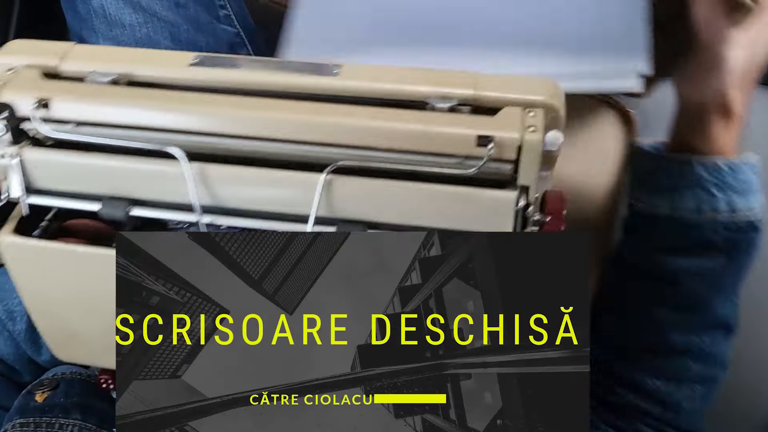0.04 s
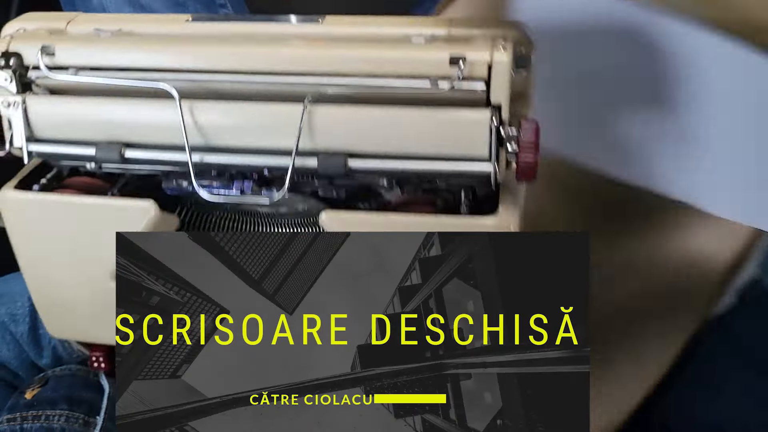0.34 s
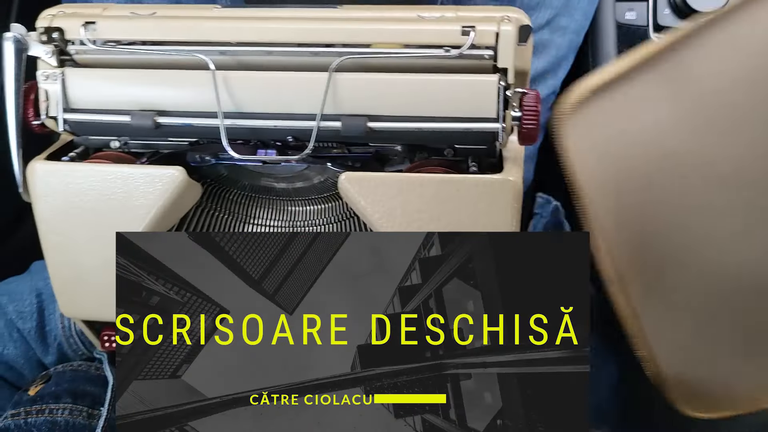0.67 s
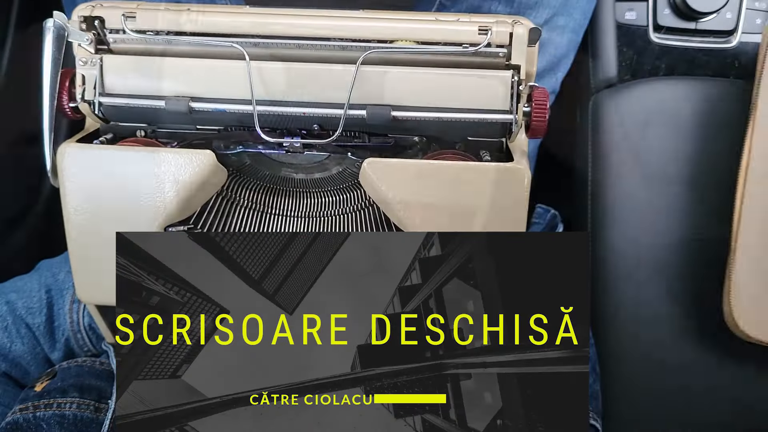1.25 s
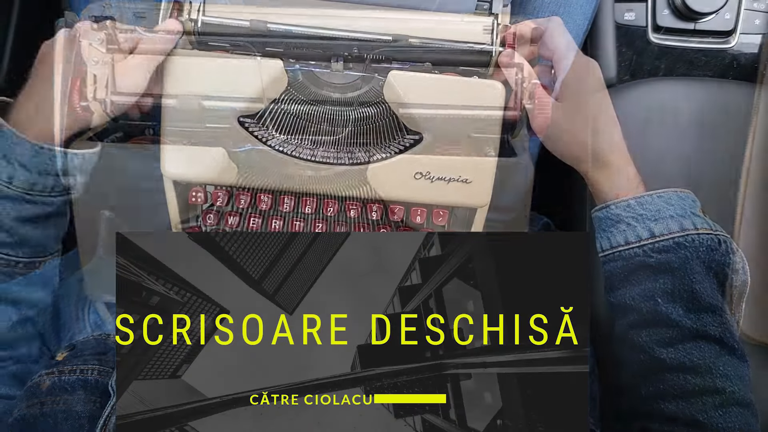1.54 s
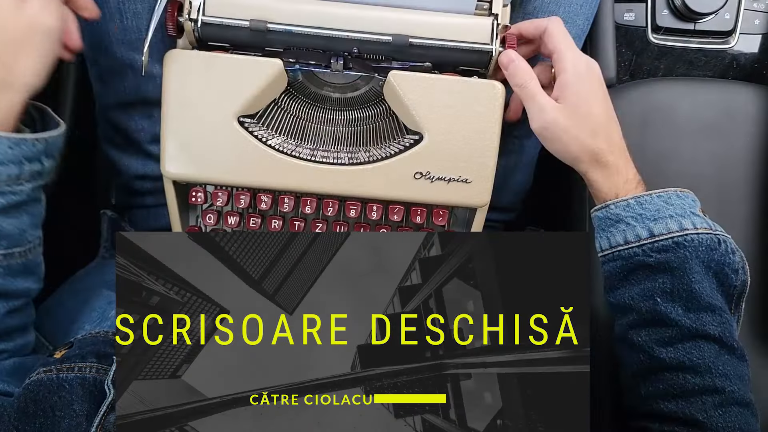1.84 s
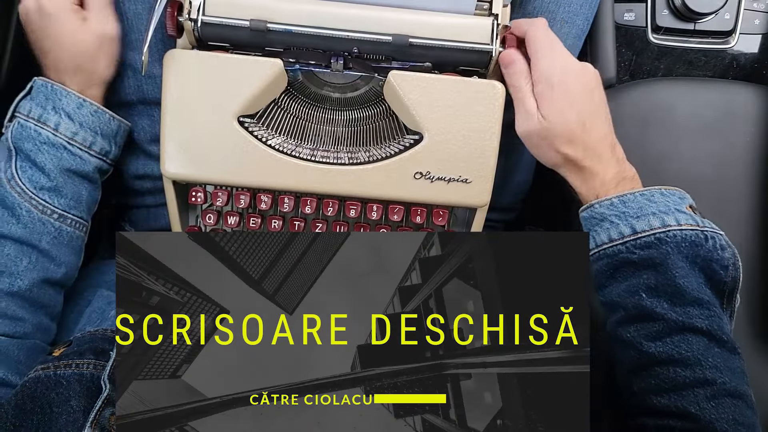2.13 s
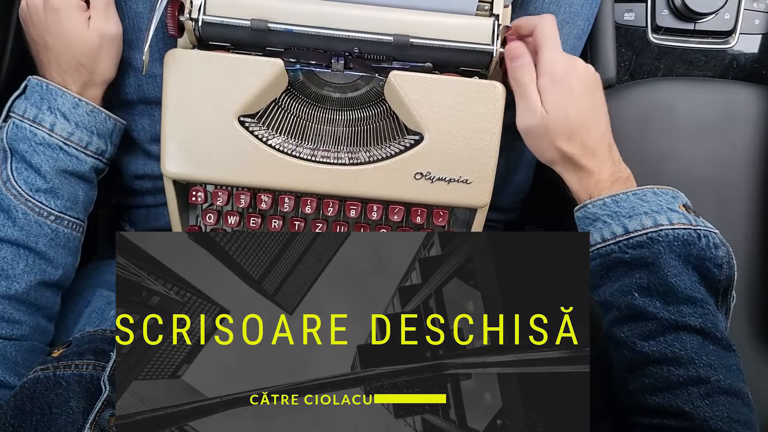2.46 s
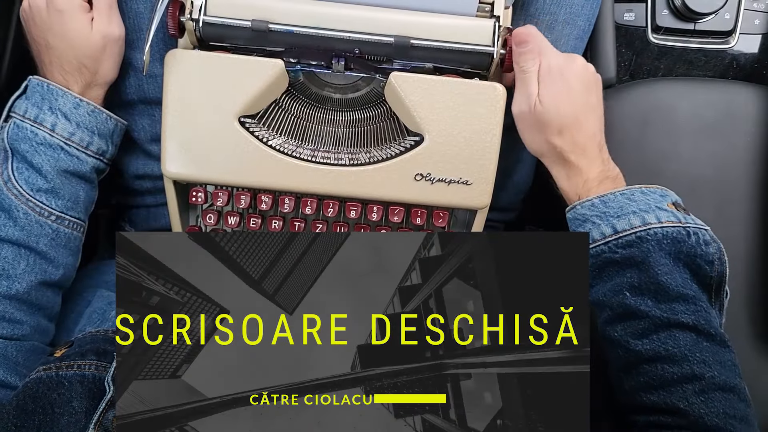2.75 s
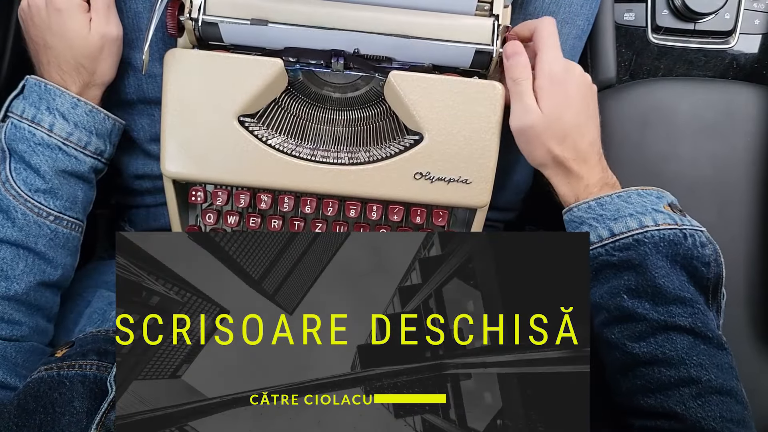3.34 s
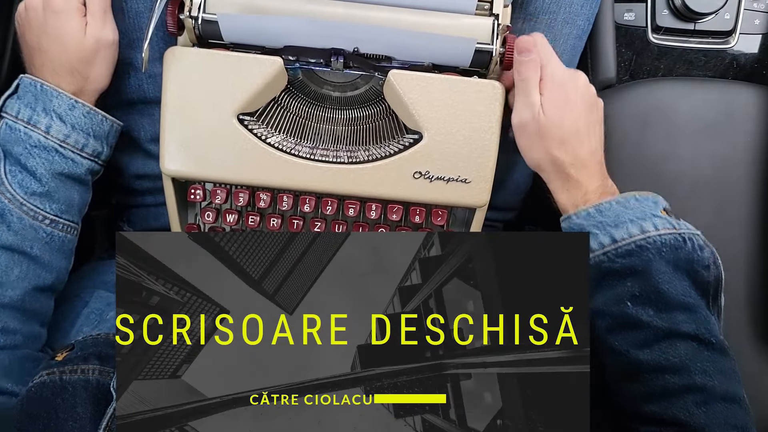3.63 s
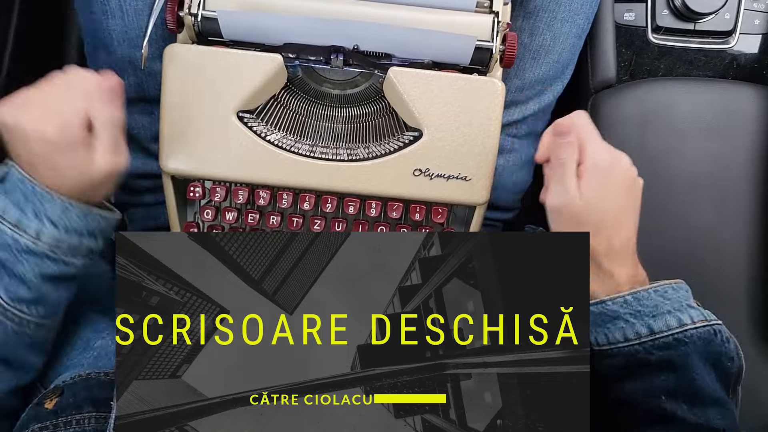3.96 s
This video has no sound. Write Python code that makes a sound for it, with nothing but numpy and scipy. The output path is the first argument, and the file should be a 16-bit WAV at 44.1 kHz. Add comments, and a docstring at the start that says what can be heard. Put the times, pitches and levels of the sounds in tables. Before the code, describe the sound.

A typewriter's roller ratchets close by in an idling car. First the cover knocks off and paper and sleeves rustle; at 0.9 seconds it lands and slides with two faint pings. Near 1.5 seconds a dry tick sounds, the hum drops, and hands knock the machine. Runs of metallic ratchet clicks come at about 2.2, 2.6, 3.0 and 3.5 seconds, followed by a soft knock and rustle.

```python
"""In an idling car, a portable typewriter's cover knocks as it is lifted off; paper and denim sleeves rustle.
Near 0.9 s the cover lands to the right, beside the seat, slides, and its metal catch pings twice.
At 1.5 s the low hum drops with one dry tick, then hands knock on the machine as they take the carriage.
From 2.2 s the platen knob turns in short strokes: the pawl snaps over the ratchet teeth and rings
the frame. The small padded cabin answers briefly."""
import sys
import numpy as np
from scipy import signal
from scipy.fft import rfft, irfft, next_fast_len
from scipy.io import wavfile
from scipy.ndimage import uniform_filter1d, map_coordinates

SR = 44100
rng = np.random.default_rng(int(sys.argv[2]) if len(sys.argv) > 2 else 0)


def to_wav(s):
    """Save 16-bit WAV."""
    ch = np.atleast_2d(s).T  # columns
    pcm = np.round(np.clip(ch, -1, 1) * 32767)  # PCM
    wavfile.write(sys.argv[1], SR, pcm.astype(np.int16))


N = 176400
T = np.arange(N) / SR
AGE = T[:SR // 3]  # seconds since a hit

# how alike close sounds are at the two ears: freq_hz, correlation
NEAR_CORRELATION = [(200, 1), (700, 0.42), (1500, 0.18), (2800, -0.037), (12000, -0.076)]


def ratchet():
    """The pawl cracks down on each tooth and rings with the frame; loose parts rattle, the case booms."""
    # pawl snaps: start_s, body_db, low_ring_db, high_ring_db, crack_db
    snaps = [(2.1787, -20, -39, -43, -31), (2.1858, -28, -30, -38, -34), (2.1944, -19.5, -45, -28, -46),
             (2.2063, -24, -58, -56, -95), (2.2685, -23.5, -35.5, -48, -37.5), (2.2829, -21, -30, -36, -42),
             (2.304, -22.5, -34, -31, -60), (2.3204, -23, -34, -35, -44.5), (2.3405, -23.5, -39, -38, -40),
             (2.362, -25.5, -24.5, -29.5, -21.5), (2.4503, -27.5, -34, -38.5, -53.5),
             (2.6395, -24.5, -26, -41, -34), (2.6463, -20.5, -33.5, -25.5, -23),
             (2.6543, -23, -27, -36.5, -58), (2.6616, -21, -23.5, -32, -45.5),
             (2.6748, -24, -38, -35.5, -44), (2.6926, -23.5, -38, -33, -45),
             (2.7077, -22, -22, -32.5, -45.5), (2.7225, -21, -27, -31.5, -46),
             (2.7337, -24, -34.5, -29.5, -47), (2.746, -20.5, -27.5, -36, -62),
             (2.764, -25.5, -38, -30.5, -48.5), (2.8229, -31, -33, -42, -50), (3.022, -25, -39, -45, -35),
             (3.0303, -23.5, -26.5, -28.5, -32), (3.0346, -20, -27.5, -29, -28.5),
             (3.0382, -27, -32.5, -30, -55.5), (3.0432, -22, -24.5, -34.5, -35),
             (3.0543, -23, -28, -27, -42), (3.07, -24.5, -27, -30, -26), (3.0859, -22, -30.5, -30, -38),
             (3.0959, -24.5, -24, -35.5, -39), (3.1066, -21, -48, -27.5, -43),
             (3.1174, -23.5, -29, -43, -26), (3.1283, -23.5, -30.5, -31, -29),
             (3.14, -24, -41.5, -28.5, -51), (3.1557, -22.5, -43, -32.5, -44),
             (3.1715, -34, -52, -60.5, -40), (3.455, -21.5, -31.5, -31, -31),
             (3.4625, -22.5, -42, -42, -32), (3.4729, -21.5, -48, -28, -27.5),
             (3.4885, -21.5, -55, -49, -47), (3.5123, -25, -30, -42, -31.5),
             (3.6426, -39.5, -49, -68, -41.5)]
    # the pawl's low and high ring: pitch_hz, gain_db, t60_s, left_over_right_db, left_lead_ms
    pawl_modes = [(1820, 11, 0.013, 9.5, 0), (2746, 13, 0.015, 5.5, 0.097)]
    # frame resonances: pitch_hz, gain_db, t60_s, left_over_right_db
    frame_modes = [(133.4, -20.5, 0.12, 3), (269.6, -25.5, 0.18, 3.5), (425, -26, 0.14, 12),
                   (846, -23.5, .08, -4.5), (1224, -27, .04, 12), (1594, -18.5, 0.039, 19),
                   (1776, -21.5, 0.034, 25), (1945, -16.5, 0.05, -0.5), (2260, -22, 0.085, -9.5),
                   (2710, -22, 0.066, -10.5), (2927, -24, 0.043, 5), (4360, -21.5, 0.016, 18.5),
                   (5360, -24.5, 0.023, -11), (7850, -28, 0.034, -13)]
    # tone of the crack, the loose parts and the hollow case: freq_hz, gain_db
    crack_eq = [(200, -0.5), (600, -4), (1200, 15), (3000, 5.5), (3600, -5.5), (5400, 2), (6500, -18.5),
                (8100, 10.5), (9000, -21.5), (16000, -12.5)]
    rattle_eq = [(120, -28.5), (200, -12), (300, -10), (424, -4.5), (500, -10), (650, -9.5), (836, -9),
                 (1480, -3.5), (1870, -13), (2130, -12.5), (2750, -6), (3830, -11), (5400, -13.5),
                 (8000, -21.5), (10000, -23.5), (16000, -28)]
    case_eq = [(90, -13), (140, 4.5), (200, -7.5), (280, -1.5), (430, -8.5), (560, -11), (900, -6.5),
               (1500, -12.5), (2500, -22), (5000, -32), (16000, -59.5)]
    out = np.zeros((2, N))
    for start, body_db, low_db, high_db, crack_db in snaps:
        pawl = frame = 0
        for ring_db, (hz, gain_db, t60, side_db, lead_ms) in zip((low_db, high_db), pawl_modes):
            pitch = hz * (1 + 0.043 * rng.normal())
            mode = ring(pitch, t60, attack_s=0.0013, lead_s=lead_ms / 1000)
            pawl += amp(ring_db + gain_db) * pan(side_db) * mode
        for hz, gain_db, t60, side_db in frame_modes:
            strength = amp(gain_db + rng.normal())
            pitch = hz * (1 + 0.012 * rng.normal())
            frame += strength * pan(side_db) * ring(pitch, t60)
        rattle = amp(-11) * burst(rattle_eq, t60=0.054)
        boom = amp(-23) * burst(case_eq, t60=0.19)
        crack = amp(crack_db + 5) * burst(crack_eq, t60=0.0056, attack_s=0.00026)
        add(out, start, pawl + amp(body_db) * (frame + rattle + boom) + crack)
    return out


def cover():
    """The cover thuds and rings at each contact, slides to rest, and its catch clicks and pings."""
    # two knocks coming off, then the landing: start_s, level_db, tilt_db_per_octave
    hits = [(.0425, -37.5, 5), (.101, -41.5, 0.5), (.9155, -25.5, 1), (.925, -30.5, 1.5), (.976, -68, 4),
            (.988, -48, 0)]
    # cover resonances: pitch_hz, gain_db, t60_s
    modes = [(233, -14, 0.093), (347, -8, 0.074), (456, -2, 0.051), (591, -8, .05), (1004, -17, .058),
             (1230, -14.5, 0.047), (1565, -9.5, .1), (1780, -7.5, 0.024), (2850, -20, 0.081)]
    # swell of the slide: time_s, level_db
    slide = [(.925, -88), (.94, -49), (.98, -43.5), (1.01, -52), (1.05, -52), (1.067, -46), (1.085, -58),
             (1.15, -63.5), (1.25, -80)]
    # tone of the scrape, the thud and the catch's click: freq_hz, gain_db
    scrape_eq = [(240, -17.5), (400, 2), (700, -6.5), (1000, -8.5), (1450, -3.5), (2000, -4), (4200, -10.5),
                 (6000, -15), (12000, -22), (16000, -29.5)]
    thud_eq = [(90, -18), (150, -7.5), (300, 19), (550, -13), (800, -5.5), (1150, -10), (1560, 0),
               (2200, -4.5), (2850, -7.5), (3200, -9.5), (4500, -16.5), (8000, -28.5), (16000, -45.5)]
    catch_eq = [(500, -18), (2000, -7), (5000, -6.5), (7000, 8), (9500, -0.5), (11000, -10), (16000, -13)]
    # the treble leans right, where the cover lies: freq_hz, left_over_right_db
    balance = [(300, 0), (1200, 0), (3000, -3), (12000, -3.5)]
    pings = [(1.012, -60.5), (1.066, -54)]  # start_s, level_db
    out = envelope(slide) * friction(scrape_eq, colour_db=0.5, grain_db=0.77, grain_hz=400)
    for start, db, tilt in hits:
        ringing = sum(amp(gain_db + tilt * np.log2(hz / 1000)) * ring(hz, t60)
                      for hz, gain_db, t60 in modes)
        thud = amp(2) * burst(thud_eq, t60=0.038, tilt=tilt)
        add(out, start, amp(db) * (ringing + thud))
    for start, db in pings:
        ping = ring(hz=12140, t60=0.22)
        click = amp(10) * burst(catch_eq, t60=0.046)
        add(out, start, amp(db) * (ping + click))
    side_db = curve(balance, np.fft.rfftfreq(N, 1 / SR))
    return irfft(rfft(out) * amp(np.array([side_db, -side_db]) / 2), N)


def handling():
    """Paper and sleeves rustle, hands knock on the shell, and the machine bumps softly on the lap."""
    # swells of paper and sleeves: time_s, level_db
    rustle = [(0, -52.5), (.13, -58.5), (.18, -58), (.34, -58.5), (.38, -63.5), (.46, -69.5), (.59, -64),
              (.68, -73.5), (.85, -75.5), (1.9, -99), (2.08, -73), (2.55, -81.5), (2.88, -71), (2.97, -102),
              (3.28, -68.5), (3.4, -101), (3.6, -71.5), (3.72, -63), (3.87, -59), (4, -66)]
    # knocks on the shell: start_s, level_db, tilt_db_per_octave, t60_s
    knocks = [(0.0406, -35, 3, 0.021), (0.099, -41.5, 4, 0.063), (0.114, -43.5, -2.5, 0.063),
              (1.669, -37, 9.5, 0.055), (1.674, -33, 3, 0.055), (1.682, -38, -2.5, 0.15),
              (1.75, -48, -4, 0.046), (1.765, -44, -2, 0.078), (3.646, -41, -3.5, 0.068)]
    # tone of the rustle and the shell: freq_hz, gain_db
    cloth_eq = [(400, -0.5), (800, -5.5), (1440, -7.5), (2500, -8.5), (4500, -11.5), (8000, -18.5),
                (10100, -24.5), (14000, -23.5), (16000, -26.5)]
    shell_eq = [(150, -30), (400, 12.5), (800, 3.5), (1400, 5), (3000, -1), (5000, -11), (8000, -19.5),
                (16000, -35.5)]
    bumps = [(0.001, -25.5), (0.33, -30), (0.917, -32), (1.678, -31), (1.744, -36.5)]  # start_s, level_db
    out = envelope(rustle) * friction(cloth_eq, colour_db=1.45, grain_db=1, grain_hz=300)
    for start, db, tilt, t60 in knocks:
        add(out, start, amp(db) * burst(shell_eq, t60, tilt))
    for start, db in bumps:
        add(out, start, amp(db) * ring(hz=118.2, t60=0.16, attack_s=0.0047))
    return out


def tick():
    """One small dry tick in the centre, as the low hum drops."""
    out = np.zeros((2, N))
    add(out, start_s=1.5308, sound=amp(-32.5) * decay(AGE, t60=0.0048))
    return out


def cabin_echo(sound):
    """Close reflections off roof, glass and dashboard, with a short tail that dies first in the treble."""
    damping = [(150, 0.75), (1000, 0.28), (3000, 0.15), (12000, 0.11)]  # freq_hz, t60_s
    hz, t, bands = signal.stft(rng.standard_normal((2, len(AGE))), SR, nperseg=256)
    tail = signal.istft(bands * decay(t, curve(damping, hz)[:, None]), SR, nperseg=256)[1]
    response = amp(-19) * tail / np.linalg.norm(tail[0])
    for ear in response:
        delays_s = rng.uniform(0.004, 0.016, size=6)
        ear[(delays_s * SR).astype(int)] += amp(-18)
    return signal.fftconvolve(sound, response, axes=1)[:, :N]


def idling_car():
    """The engine's low orders waver over the cabin's rumble; partway through, the hum settles lower."""
    # engine orders: multiple, early_db, late_db
    orders = [(1, -55, -69), (2, -47.5, -50.5), (3, -52.5, -52), (4, -50, -55.5), (5, -62, -65.5)]
    # tone of the rumble: freq_hz, gain_db
    rumble_eq = [(12, -47.5), (22, -20.5), (40, -10), (70, -1), (116, -5.5), (172, -13), (420, -17),
                 (560, -27), (750, -25.5), (1150, -35.5), (1700, -39.5), (3070, -64.5), (7000, -68.5),
                 (11500, -59.5), (16000, -79.5)]
    # its slow swell: time_s, level_db
    rumble_swell = [(0, -49), (1.4, -46.5), (1.65, -49), (4, -50.5)]
    # its width, narrowest in the bass: freq_hz, correlation
    rumble_correlation = [(100, 0.9), (300, 0.67), (1000, 0.17), (3000, .1)]
    idle_hz, settle_s = 26.26, 1.515
    cycles = np.cumsum(idle_hz * (1 + 0.0037 * wobble(rate_hz=4.1))) / SR
    hum = 0
    for order, early_db, late_db in orders:
        level = envelope([(settle_s - 0.03, early_db), (settle_s + 0.036, late_db)])
        waver = amp(0.52 * order * wobble(rate_hz=5.46))
        hum += level * waver * np.sin(2 * np.pi * (order * cycles + rng.random()))
    rumble = envelope(rumble_swell) * noise(rumble_eq, rumble_correlation, N)
    return (np.sqrt(2) * hum + rumble) * pan(2.3)


def ring(hz, t60, attack_s=0.0011, lead_s=0):
    """One struck mode in a random phase, reaching the left ear lead_s ahead of the right."""
    t = AGE + np.array([[lead_s], [-lead_s]]) / 2
    onset = 1 - np.exp(-(AGE / attack_s) ** 2)
    return np.sin(2 * np.pi * (hz * t + rng.random())) * decay(AGE, t60) * onset


def burst(eq, t60, tilt=0, attack_s=0.0007):
    """A dying puff of noise."""
    onset = 1 - np.exp(-AGE / attack_s)
    return noise(eq, NEAR_CORRELATION, len(AGE), tilt) * decay(AGE, t60) * onset


def friction(eq, colour_db, grain_db, grain_hz):
    """Rubbing noise of rms 1: its colour shifts in patches and its level flickers with a fine grain."""
    bands = signal.stft(noise(eq, NEAR_CORRELATION, N), nperseg=512)[2]
    patches = rng.standard_normal(bands.shape[1:])
    for axis in (0, 1):
        patches = uniform_filter1d(patches, size=8, axis=axis)
    rub = signal.istft(bands * amp(colour_db * unit_rms(patches)), nperseg=512)[1][:, :N]
    return unit_rms(rub * amp(grain_db * wobble(grain_hz)))


def noise(eq, correlation, size, tilt=0):
    """Coloured stereo noise of rms 1, tilted in dB per octave."""
    hz = np.fft.rfftfreq(size, 1 / SR)
    width = np.arccos(np.clip(curve(correlation, hz), -1, 1)) / 2
    gain = amp(curve(eq, hz) + tilt * np.log2(hz + 1))
    white = rfft(rng.standard_normal((2, size)))
    mid, side = irfft(white * gain * [np.cos(width), np.sin(width)], size)
    return unit_rms(np.array([mid + side, mid - side]))


def amp(db):
    """Decibels to gain."""
    return 10 ** (np.asarray(db) / 20)


def unit_rms(x):
    """Scale to rms 1."""
    return x / np.sqrt(np.mean(x ** 2) + 1e-20)


def curve(points, hz):
    """Join (freq_hz, value) points along a log frequency axis."""
    freqs, values = np.transpose(points)
    return np.interp(np.log(hz + 1), np.log(freqs + 1), values)


def envelope(points):
    """Turn (time_s, level_db) points into a gain per sample."""
    return amp(np.interp(T, *np.transpose(points)))


def wobble(rate_hz):
    """A smooth curve through rate_hz random values a second."""
    return map_coordinates(rng.standard_normal(int(T[-1] * rate_hz) + 4), [T * rate_hz])


def pan(db):
    """Stereo gains with the left louder by db."""
    return amp(np.array([[db], [-db]]) / 2)


def decay(t, t60):
    """Fall by 60 dB every t60 seconds."""
    return 1000.0 ** (-t / t60)


def add(track, start_s, sound):
    """Mix a sound in at a time."""
    part = track[:, max(round(start_s * SR), 0):][:, :sound.shape[-1]]
    part += sound[..., :part.shape[1]]


def scene():
    """Typewriter, cover and hands with their cabin echo, over the idling car and the dry tick."""
    near = ratchet() + cover() + handling()
    return near + cabin_echo(near) + idling_car() + tick()


def record(dry):
    """A steep, smooth high cut takes off the very top."""
    top_hz, slope_width_hz = 16450, 650
    size = next_fast_len(N + SR // 2)
    edge = np.clip((top_hz - np.fft.rfftfreq(size, 1 / SR)) / slope_width_hz, 0, 1)
    return irfft(rfft(dry, size) * np.sin(np.pi / 2 * edge) ** 2, size)[:, :N]


dry = scene()
out = record(dry)
to_wav(out)
```